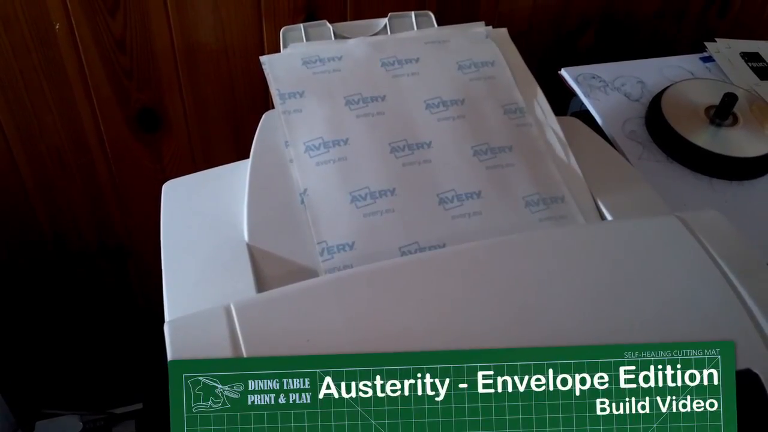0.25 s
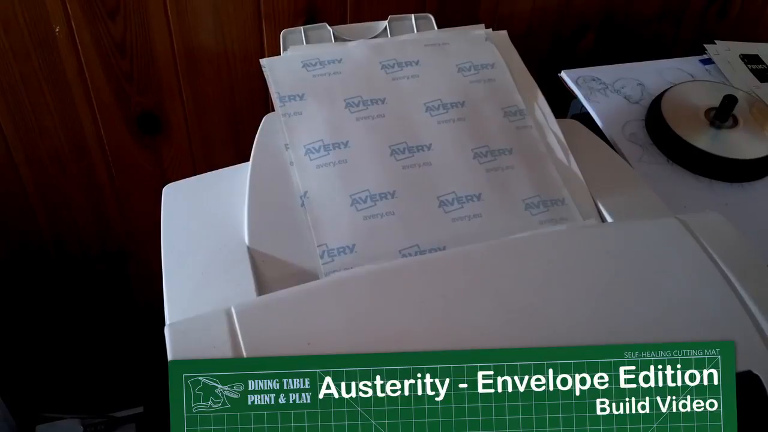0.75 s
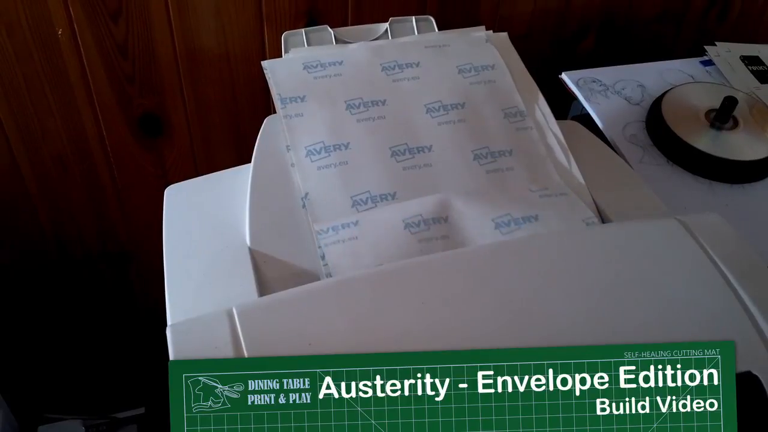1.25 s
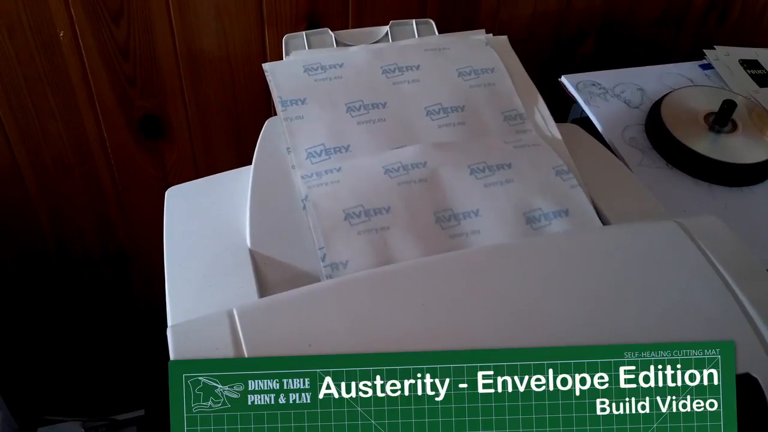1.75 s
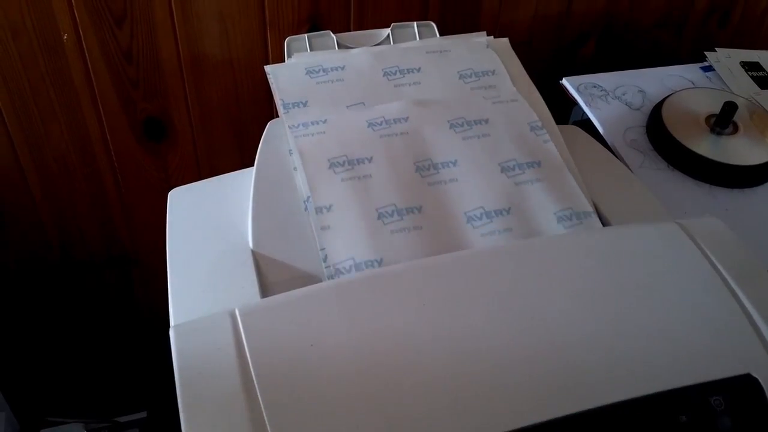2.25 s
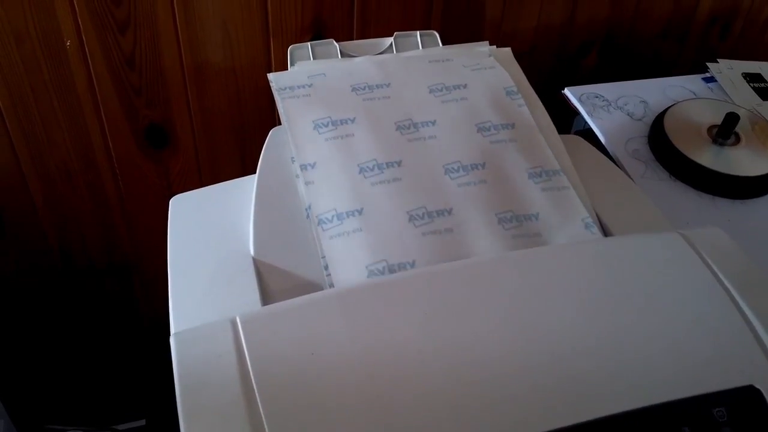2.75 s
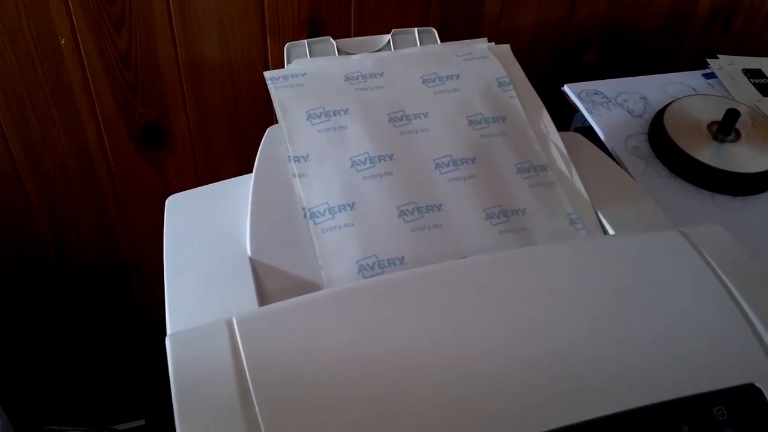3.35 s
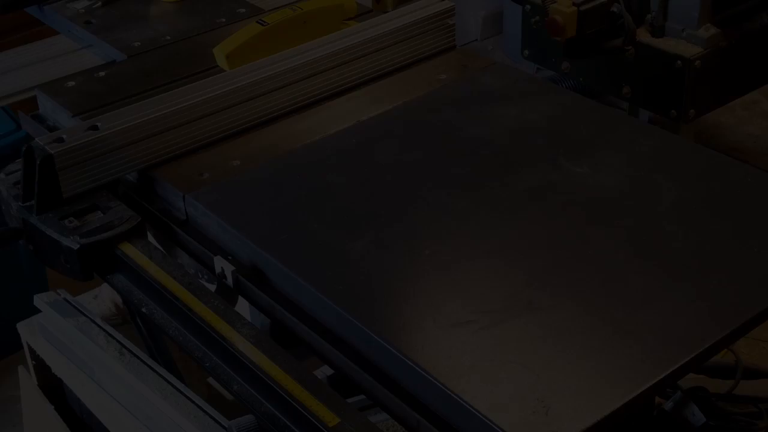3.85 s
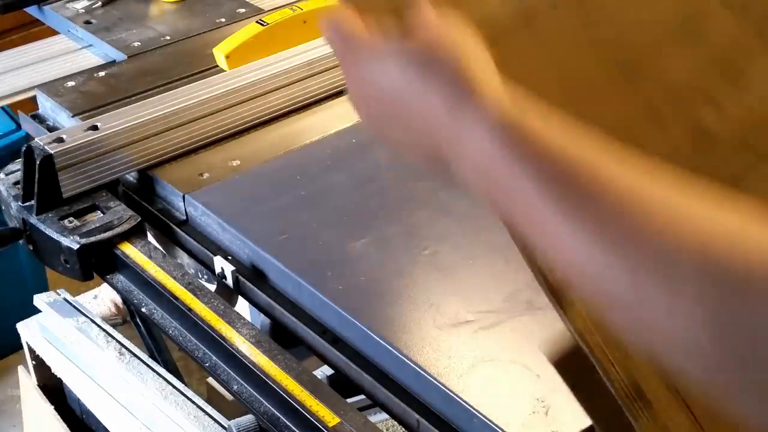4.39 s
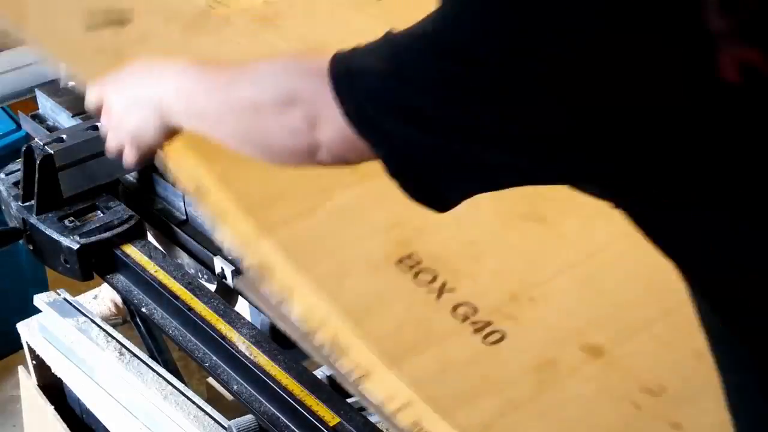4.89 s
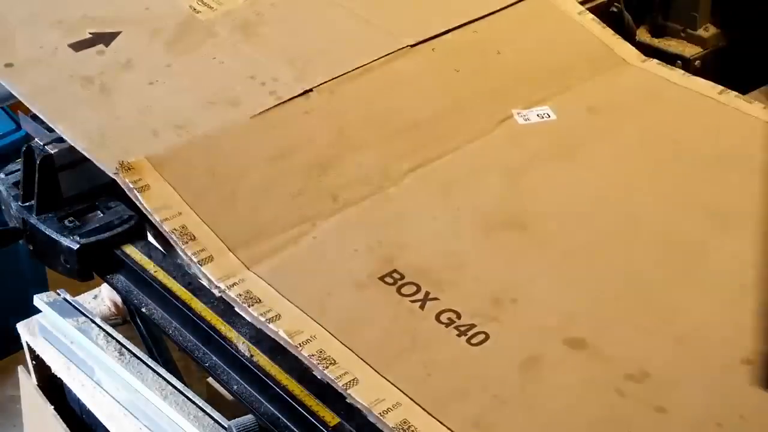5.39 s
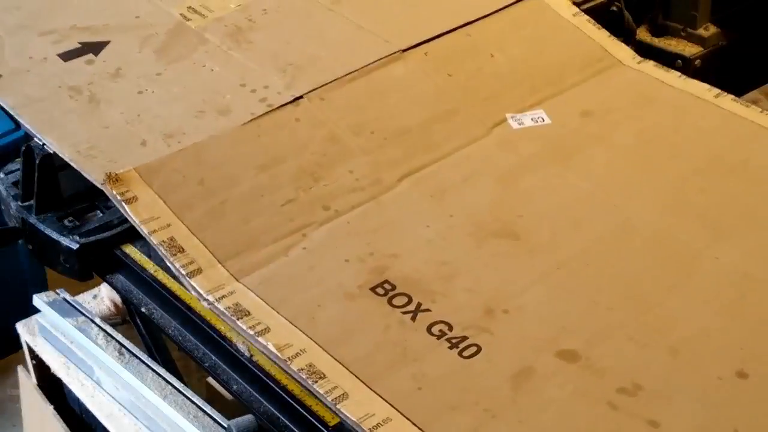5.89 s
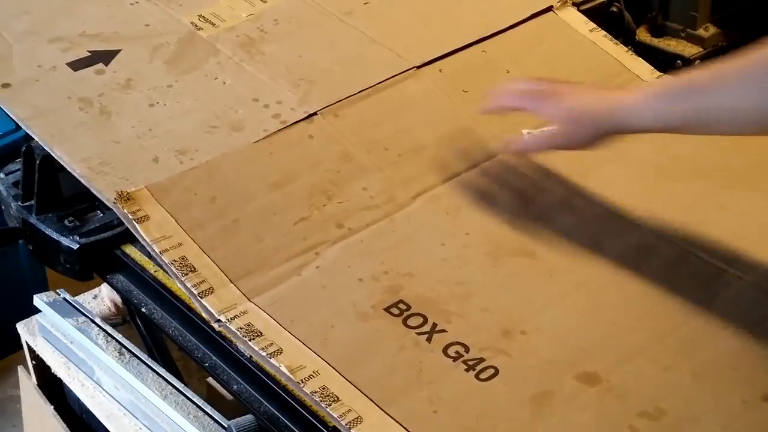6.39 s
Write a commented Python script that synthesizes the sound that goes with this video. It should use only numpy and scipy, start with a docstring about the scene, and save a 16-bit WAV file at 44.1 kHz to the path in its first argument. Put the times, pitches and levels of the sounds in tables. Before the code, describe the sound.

From 0 to 3.8 seconds a desktop printer runs close by in wide stereo: a steady, many-toned gear and fan whine over low fluttering hum and airy roller hiss. Faint bright ticks come about ten times a second at most, loosely spaced, with crisp paper snaps near 0.3, 1.1, 1.3, 2.5 and 2.9, and the sharpest crack at 3.2. From 3.65 it dips, treble first, and cuts off at 3.79. Now mono, in a small, briefly reflective workshop: quiet cardboard rustles and bumps, a buckling pop at 4.04, scrapes around 4.6. Two heavy, hollow board slaps hit at 4.86 and 4.99, by far the loudest moment, ringing briefly. Softer knocks and sliding follow at 5.25 to 5.65, then gentle dry rubbing, small pats and faint squeaks from 5.8 to 6.6, with a soft final scrape.

```python
"""Desk, then workshop: a desktop printer runs, then a large cardboard sheet is handled on a bench.
Printer, stereo: gear and fan tones whine and hum, shaped noise makes the air and roller hiss,
noise bursts and struck resonances make snaps and ticks. It fades, treble first, and is cut off.
Cardboard, at a single microphone: carried in, dropped twice, slid flat and patted. Uneven noise drives board
modes and coloured rubbing; narrow-band blips and squeaks, rung modes, one pop and reflections are added."""
import sys
import numpy as np
from scipy import signal
from scipy.fft import rfft, irfft
from scipy.io import wavfile

SR = 44100
rng = np.random.default_rng(int(sys.argv[2]) if len(sys.argv) > 2 else 0)


def put_to_file(sound):
    """Save the sound as 16-bit audio at rate SR, in the file named by the first command-line argument."""
    columns = np.atleast_2d(sound).T  # one column per channel
    safe = np.clip(columns, -1, 1)
    whole_steps = np.round(safe * 32767)
    wavfile.write(sys.argv[1], SR, whole_steps.astype(np.int16))


N = 292383
SWITCH_S = 3.786   # printer cut off, cardboard starts


def amp(db):
    """Amplitude factor from dB."""
    return np.exp(np.asarray(db) * np.log(10) / 20)


def rms_one(x):
    """Scale to rms 1."""
    return x / np.sqrt(np.mean(x ** 2) + 1e-20)


def in_time(rows):
    """Each column interpolated over the samples; first column is seconds."""
    s, *columns = np.transpose(rows)
    return [np.interp(np.arange(N) / SR, s, column) for column in columns]


def gain_at(points):
    """Gain on the FFT grid, straight in dB over log frequency."""
    grid_hz = np.maximum(np.arange(N // 2 + 1) * SR / N, 1)
    points_hz, points_db = np.array(points)[:, 0], np.array(points)[:, 1]
    return amp(np.interp(np.log(grid_hz), np.log(points_hz), points_db))


def drift(corner_hz):
    """Slow chance, spread 1: noise at SR / 40 through two equal poles."""
    r = np.exp(-80 * np.pi * corner_hz / SR)
    noise = rng.standard_normal(N // 40 + 2002)
    slow = signal.lfilter([1], [1, -2 * r, r * r], noise)[2000:]   # settled part
    return np.interp(np.arange(N) / 40, np.arange(len(slow)), rms_one(slow))


def ring(x, hz, t60_s):
    """Resonator: a unit click sets a decaying sine of height 1 ringing."""
    r, w = amp(-60 / (t60_s * SR)), 2 * np.pi * hz / SR
    return signal.lfilter([0, np.sin(w)], [1, -2 * r * np.cos(w), r * r], x + 1e-18)


def cut(x, hz, kind, order=2):
    """Butterworth filter."""
    return signal.sosfilt(signal.butter(order, hz, kind, fs=SR, output="sos"), x)


def burst(start_s, t60_s, rise_s):
    """Envelope: quick rise, exponential fall."""
    out, start = np.zeros(N), int(start_s * SR) + 1
    age_s = np.arange(start, min(N, start + int(2 * t60_s * SR))) / SR - start_s
    out[start:start + len(age_s)] = (1 - np.exp(-age_s / rise_s)) * amp(-60 * age_s / t60_s)
    return out


def grains(spread_db):
    """Noise of uneven contacts, rms 1."""
    return rms_one(rng.standard_normal(N) * amp(spread_db * np.minimum(rng.exponential(1, N), 4)))


# Air and rollers, noise density. Each row: Hz, dB per Hz.
AIR_DENSITY = [(40, -116), (90, -110), (130, -101), (250, -95), (340, -96.5), (700, -84.5), (1150, -88),
               (1350, -89), (2700, -89), (3000, -92.5), (5500, -90), (6200, -96.5), (7500, -101),
               (12000, -106), (15500, -120)]
# Housing resonances. Each row: centre in Hz, width in Hz, nominal level in dB.
HOUSING_MODES = [(289, 38, -73), (381.6, 13.5, -64), (410, 19, -63.5), (500.6, 56, -59), (557, 88, -63),
                 (821, 10, -67), (1105, 94, -63.5), (2150, 150, -76), (2760, 64, -68.5), (4410, 64, -69),
                 (5030, 200, -81), (9100, 150, -93)]
# Narrow bands cancelled by the desk's reflection. Each row: centre in Hz, width in Hz, depth in dB.
DESK_DIPS = [(744, 71, -2), (1396, 120, -2.5), (2410, 120, -2), (2810, 75, -3.5), (3060, 69, -2),
             (5510, 180, -5.5), (6960, 270, -3)]
# Stereo width of the air. Each row: Hz, side over mid in dB.
AIR_SIDE_OVER_MID = [(60, -14), (99, -8), (160, -10), (270, -12), (450, -16.5), (740, -13), (1220, -11),
                     (2010, -6.5), (3330, 1), (5500, -4.5), (9080, -1.5), (15000, 1)]
# Balance of the air. Each row: Hz, left over right in dB.
AIR_BALANCE = [(60, -2), (92, 1), (140, 5.5), (210, -1.5), (330, 3.5), (500, 1), (770, 0.5), (1170, 1),
               (1790, 1), (2740, 3.5), (4190, 0.5), (6410, -3), (9810, 1), (15000, 0.5)]


def air():
    """Broad noise plus noise in the housing resonances; width and balance vary with frequency."""
    hz = np.arange(N // 2 + 1) * SR / N
    power = gain_at(AIR_DENSITY) ** 2
    for centre_hz, width_hz, level_db in HOUSING_MODES:
        offset = 2 * (hz - centre_hz) / width_hz
        power = power + amp(level_db) ** 2 / width_hz / (1 + offset ** 2) ** 2
    for centre_hz, width_hz, depth_db in DESK_DIPS:
        offset = 2 * (hz - centre_hz) / width_hz
        power = power * amp(depth_db / (1 + offset ** 2)) ** 2
    mid, side = rfft(rng.standard_normal((2, N))) * np.sqrt(power * SR / 2)
    side = side * gain_at(AIR_SIDE_OVER_MID)
    pan = np.sqrt(gain_at(AIR_BALANCE))
    return amp(.5 * drift(10.5)) * irfft([(mid + side) * pan, (mid - side) / pan], N)


SHAFT_HZ = 33.629
# Motor and gear teeth. Each row: multiple of shaft speed, level in dB, left over right in dB, left lead in rad.
GEAR_TONES = [(24, -65.5, -1.0, 0.1), (30, -65.0, -0.6, 0.1), (51, -75, 0, 0.0), (52, -75, 0, 0.0),
              (56, -73.0, 1.5, 0.0), (60, -75, -2.8, -0.0), (64, -70.2, -1.1, -0.3), (65, -67.1, 1.2, -0.7),
              (70, -71.6, 1.6, -2.6), (73, -71.6, 1.3, 0.4), (80, -80, 9.3, 1.0), (90, -67.1, 2.9, 2.6),
              (95, -83, 1.8, -1.0), (97, -81, -2.1, 0.4), (110, -74.5, 4.9, -2.5), (120, -62.9, 6.3, 0.4),
              (121, -73.5, 4.4, 0.5), (139, -80.5, -0.9, -0.1), (140, -68.6, -1.3, 0.4),
              (145, -77, -2.2, 0.1), (150, -73.2, 2.3, -0.8), (155, -80.5, -3.2, -1.1),
              (159, -66, -4.6, 0.1), (160, -63.7, -6.4, 0.8), (165, -71.5, -8.1, 1.5),
              (169, -74.5, -3.9, 0.9), (170, -60.2, -4.0, 0.2), (174, -83, -6.1, 0.5),
              (175, -73.5, -4.5, 1.1), (180, -69.7, -6.6, -3.1), (181, -80.3, -5.2, 0.7),
              (185, -77.6, 4.9, 1.0), (190, -74.0, -5.3, -1.0), (193, -85, -7.6, -0.4),
              (195, -78.1, -9.1, -2.4), (199, -80.2, -10.4, 2.8), (200, -64.3, -10.8, -3.1),
              (205, -86.5, 0.9, -1.6), (210, -82.8, -1.7, -1.9), (215, -79.6, -3.4, 0.6),
              (220, -86, -12.6, 0.9), (230, -78.3, -6.9, -2.7), (255, -86.5, -3.1, 1.8),
              (265, -85, -2.4, 1.4), (269, -91, -0.8, 0.1), (270, -79.5, 3.2, 0.6), (295, -82.7, 3.3, 1.0),
              (385, -95, -4.2, -0.5)]
# Fans and other rotors. Each row: Hz, level in dB, left over right in dB, left lead in rad.
ROTOR_TONES = [(392.3, -58, 1.6, 0.2), (535.9, -71.0, -0.1, -0.2), (783.9, -69.6, 1.0, 0.1),
               (1472.3, -65.8, 1.9, -0.4), (1991.8, -80, 0.3, 0.4), (2239.9, -71.2, 3.6, -0.2),
               (2485.3, -72.4, -2.6, 0.3), (2742.8, -78, 7.8, -0.3), (2943.7, -73.8, 3.9, 0.0),
               (3133.5, -68, 12.9, 0.4), (3529.2, -70.6, -1.7, -2.4), (12061.7, -72.5, 10.0, -2.8)]
# Tone wavering. Each row: time in seconds, then added dB below 400 Hz, at 3.1-3.2 kHz, above 12 kHz.
TONE_SWELL = [(0, 2, -5, -2), (.5, 1, -2, -11), (1.3, -4, -1.5, -3), (2, -4, -1.5, -2), (2.2, 5.5, -2, 1),
              (2.8, 2, -2.5, 1), (3.65, 2.5, -0.5, 4), (3.68, 2, -8, -14), (3.8, 4, 12, -15)]
WHINE_STOP_S, WHINE_STOP_DB_PER_S = 3.708, 301.5   # tones above 5 kHz die first
THROB_DB, THROB_CORNER_HZ = 2.2, 10.0   # uneven flutter of the lowest hum


def whine():
    """Steady rotor tones; each wavers and reaches the two ports with its own level and phase."""
    t, out, sides = np.arange(N) / SR, 0, np.array([[.5], [-.5]])
    stop_db = WHINE_STOP_DB_PER_S * np.maximum(t - WHINE_STOP_S, 0)
    low_db, middle_db, top_db = in_time(TONE_SWELL)
    slips = {}   # neighbouring tones slip together, so pairs pulse in step once a turn
    tones = [(multiple * SHAFT_HZ, *rest) for multiple, *rest in GEAR_TONES] + list(ROTOR_TONES)
    for hz, level_db, pan_db, lead_rad in tones:
        family = round(hz / SHAFT_HZ / 5)
        if family not in slips:
            slips[family] = 2 * np.pi * rng.random() + 0.25 * drift(6.0)
        phase = 2 * np.pi * hz * t + slips[family]
        swell_db = low_db * (hz < 400) + middle_db * (3100 < hz < 3200) + top_db * (hz > 12000)
        swell_db = swell_db - (hz > 5000) * stop_db
        waver_db = THROB_DB * drift(THROB_CORNER_HZ) if hz < 400 else 0.58 * drift(1.8)
        level = np.sqrt(2) * amp(level_db + swell_db + waver_db) * amp(pan_db * sides)
        out = out + level * np.sin(phase + lead_rad * sides)
    return out


# Sheet snapping over the guides. Each row: start in seconds, crackle in dB, thud, body and treble over
# crackle in dB, ring in Hz, ring drive in dB, crackle t60 in seconds.
GUIDE_SNAPS = [(0.2424, -53, -1, -6, -5, 5400, -65, 0.05), (0.275, -56, 4, -6, -10, 500, -62, 0.1),
               (0.296, -59, 2, -4, -10, 524, -59, 0.04), (0.3016, -43.5, -11, -3, -2.5, 5030, -64, 0.058),
               (0.3067, -45, -9, -0.5, -5, 4930, -66, 0.045), (1.0737, -47.5, -4, -9, -17, 5600, -66, 0.04),
               (1.291, -47.5, -15, -1, -9, 5600, -72, 0.036), (2.4836, -40, -13, -6, -22, 5460, -63, 0.017),
               (2.4873, -44.5, -10, -3, -22, 4030, -53, 0.033),
               (2.867, -38.5, -20, -17, -13, 2290, -51.5, 0.026),
               (2.874, -46, -22, -12, -12, 2300, -59.5, 0.08),
               (3.1914, -34.5, -22, 1, -13.5, 1480, -71, 0.073),
               (3.6606, -46.5, -15, 3, -8, 4030, -69, 0.078), (3.708, -43.5, -17, -7, -21, 2500, -61, 0.03)]
# Solid crack in the guides opening the loudest snap. Each row: Hz, strike in dB, t60 in seconds.
GUIDE_CRACK = [(1480, -30, 0.019), (2430, -40, 0.014), (3770, -31, .012), (4940, -31, 0.014),
               (5200, -23.5, 0.014), (6330, -34, 0.015)]
# Roller ticks. Each row: time in seconds, strike in dB.
ROLLER_TICKS = [(0.1336, -44.5), (0.3301, -48), (0.401, -48), (0.461, -51), (0.5438, -48), (0.6284, -50),
                (0.7203, -48), (0.8086, -47), (0.9084, -45), (0.996, -46), (1.157, -47), (1.2254, -52),
                (1.4035, -48), (1.589, -46), (1.6744, -52), (1.7394, -52), (1.903, -47), (1.9874, -51),
                (2.2544, -49), (2.6564, -44), (2.7937, -45)]
CRACK_S = 3.192
SNAP_PAN_DB = -3   # left over right
TICK_HISS_DB = -4.5   # over the strike
SNAP_BANDS_HZ = [300, 1900], [1100, 3300], [3000, 5250], [8500, 12600]   # thud, body, crackle, treble


def sheet():
    """Snaps are short crackles that ring the guides; ticks are faint, bright strikes with hiss."""
    out, crackle = np.zeros((2, N)), np.array([grains(3.7), grains(0.97)])
    crackle = 0.45 * crackle[0] + 0.72 * crackle   # partly shared by both sides
    layers = [rms_one(cut(crackle, edges_hz, "band")) for edges_hz in SNAP_BANDS_HZ]
    for s, level_db, thud_db, body_db, treble_db, hz, ring_db, t60_s in GUIDE_SNAPS:
        shape = burst(s, t60_s, 0.00027) + 0.84 * burst(s, 0.0077, 0.00033)   # crackle plus initial crack
        bands_db = level_db + thud_db, level_db + body_db, level_db, level_db + treble_db
        near = slice(int(s * SR), int(s * SR) + SR // 4)
        out[:, near] += amp(ring_db) * ring((crackle * shape)[:, near], hz, 0.015)
        out[:, near] += shape[near] * sum(amp(db) * layer[:, near] for db, layer in zip(bands_db, layers))
    click = 1. * (np.arange(N) == round(CRACK_S * SR))
    out += sum(amp(db) * ring(click, hz, t60_s) for hz, db, t60_s in GUIDE_CRACK)
    out *= amp([[SNAP_PAN_DB / 2], [-SNAP_PAN_DB / 2]])
    tick_shape = sum(amp(db + TICK_HISS_DB) * burst(s, 0.03, .0005) for s, db in ROLLER_TICKS)
    strikes = np.zeros(N)
    strikes[[round(s * SR) for s, db in ROLLER_TICKS]] = amp(np.array(ROLLER_TICKS)[:, 1])
    out += ring(strikes, 4800, 0.019) + ring(strikes, 5650, 0.011)
    hiss = rms_one(cut(crackle, [4500, 6000], "band"))
    hiss = hiss + amp(-9.0) * rms_one(cut(crackle, [8500, 11500], "band"))
    return cut(out, 320, "high") + tick_shape * hiss


BODY_DB, TREBLE_DB, SPLIT_HZ = .5, -2.5, 4600   # trims on all printer levels
FADE_START_S, BODY_FADE_DB_PER_S, TREBLE_FADE_DB_PER_S = 3.647, 29, 43
CUT_OFF_S = .006


def printer():
    """Sum of printer sources in two bands; the treble fades faster, then both are cut off."""
    t = np.arange(N) / SR
    fading_s = np.maximum(t - FADE_START_S, 0)
    on = np.clip(1 - (t - SWITCH_S) / CUT_OFF_S, 0, 1) ** 2
    x = whine() + air() + sheet()
    low, high = [cut(cut(x, SPLIT_HZ, kind), SPLIT_HZ, kind) for kind in ("low", "high")]
    body = amp(BODY_DB - BODY_FADE_DB_PER_S * fading_s) * low
    treble = amp(TREBLE_DB - TREBLE_FADE_DB_PER_S * fading_s) * high
    return on * (body + treble)


SHOP_T60_S, SHOP_DB = 0.24, -13.5


def workshop(x):
    """Reflections: dying noise after a 4 ms gap, duller than the direct sound."""
    age_s = np.arange(int(.6 * SR)) / SR
    tail = rng.standard_normal(len(age_s)) * amp(-60 * age_s / SHOP_T60_S) * (age_s > .004)
    response = cut(tail / np.linalg.norm(tail), 9100, "low")
    return amp(SHOP_DB) * signal.fftconvolve(x, response)[:N]


# Brief narrow-band noise blips, squeaks and drones. Each row: start in seconds, length in seconds, Hz,
# level at the crest in dB, resonance t60 in seconds.
NARROW_BLIPS = [(3.901, 0.046, 3200, -58, .015), (4.13, 0.026, 1290, -55, .015),
                (4.233, .02, 4600, -55, .015), (4.238, .03, 6000, -59, .008),
                (4.636, 0.045, 1660, -55.5, 0.02), (5.959, 0.025, 2280, -55, .015),
                (6.095, 0.11, 3525, -61, 0.05), (6.135, .04, 330, -52, 0.06), (6.195, .04, 330, -49, 0.06),
                (6.134, 0.088, 4400, -67, .05), (6.19, .08, 2350, -66, .02), (6.51, 0.13, 3500, -61, 0.05),
                (6.57, 0.08, 700, -50.5, 0.035), (6.555, 0.035, 342, -50, .06)]


def narrow_blips():
    """Blips, squeaks and drones: noise in a narrow resonance under a smooth swell."""
    t, out, noise = np.arange(N) / SR, 0, rng.standard_normal(N)
    for s, length_s, hz, level_db, t60_s in NARROW_BLIPS:
        swell = np.sin(np.pi * np.clip((t - s) / length_s, 0, 1))
        out = out + amp(level_db) * swell * rms_one(ring(noise, hz, t60_s))
    return out


# Low and middle modes rung by thumps and slaps. Each row: start in seconds, strike in dB, Hz.
THUMP_MODES = [(3.889, -62, 255), (4.032, -62, 256), (4.204, -42.5, 173), (4.233, -46.5, 117),
               (4.864, -32, 150), (4.866, -20, 244), (4.87, -24, 410), (4.873, -27, 654), (4.875, -33, 565),
               (4.988, -27, 247), (4.989, -25.5, 340), (4.991, -30, 544), (4.993, -23, 250.4),
               (4.998, -26, 695), (5.0, -26, 883), (5.015, -26.5, 247), (5.02, -36, 550), (5.278, -55, 255),
               (5.484, -48, 246)]
THUMP_T60_S = 0.095


def thump_modes():
    """Low and middle modes rung by thumps and slaps: each a click into one resonance, then a low-pass."""
    out = np.zeros(N)
    click = 1. * (np.arange(SR // 2) == 0)
    for s, strike_db, hz in THUMP_MODES:
        at = round(s * SR)
        out[at:at + SR // 2] += amp(strike_db) * ring(click, hz, THUMP_T60_S)
    return cut(out, 830, "low")


POP_S, POP_DB, POP_LOW_HZ, POP_HIGH_HZ = 4.03875, -26, 130, 520   # dB: peak before the bass cut


def pop():
    """The sheet buckles once, close by: a sharp push and a longer pull."""
    click = 1. * (np.arange(N) == round(POP_S * SR))
    push = cut(cut(click, [POP_LOW_HZ, POP_HIGH_HZ], "band", order=1), 4800, "low")
    return amp(POP_DB) * push / push.max()


def contact(level_db, boom_db, rustle_db, fizz_db):
    """Power of one contact in boom, scrape, rustle and fizz; fizz is relative to rustle."""
    return amp(level_db + np.array([[boom_db], [0], [rustle_db], [rustle_db + fizz_db]])) ** 2


def struck(drive, modes, spread_db):
    """Modes under uneven contact, two noises dealt in turn; a steady unit drive gives rms 1."""
    touch = [grains(spread_db), grains(spread_db)] * len(modes)
    steady_power = sum(amp(db) ** 2 * t60_s * SR / 4 / (3 * np.log(10)) for hz, db, t60_s in modes)
    ringing = sum(amp(db) * ring(g * drive, hz, t60_s) for g, (hz, db, t60_s) in zip(touch, modes))
    return ringing / np.sqrt(steady_power)


# Restless sheet. Each row: time in seconds, rustle level in dB.
BED_RUSTLE = [(3.79, -66), (4.08, -69), (4.3, -64), (4.56, -80), (4.84, -74), (5.1, -61), (5.17, -70),
              (5.55, -73.5), (6.63, -69.5)]
# Slides. Each row: peak in seconds, rise and fall in seconds per 10 dB (at least 0.001 is used),
# scrape in dB, boom over scrape in dB, rustle over scrape in dB, fizz over rustle in dB.
SHEET_SLIDES = [(3.79, -1, 0.18, -67, 7.5, 2.5, 10.5), (3.924, -0.25, 0.14, -59, 0, 2, 0.5),
                (4.006, -0.22, 0.04, -61.5, 7, 5, -3), (4.225, 0.16, 0.08, -62, 4.5, 0.5, 6),
                (4.4, 0.06, 0.1, -60.5, 0, -5, 4.5), (4.576, -0.01, -0.06, -52, -14, -14, -4),
                (4.658, 0.04, -0.02, -50, -4, -1.5, -1), (4.75, 0.5, 0.5, -66.5, -5, -2.5, 2),
                (5.131, 0.1, 0.18, -58, 7, -10, 2), (5.281, 0.03, 0.1, -51, -11, -16, -2),
                (5.37, 0.1, 0.24, -72, 2, 5.5, 6.5), (5.493, -0.05, 0.06, -52, 2, -4.5, -7),
                (5.582, -0.54, 0.12, -60, 2.5, -9, -1), (5.638, -0.17, 0.07, -57.5, 3, -3.5, -0.5),
                (5.75, -0.2, 0.4, -67, 4.5, -7, -12.5), (5.859, -0.23, 0.05, -56.5, -14, -1, -3),
                (5.972, 0, 0, -58, -7, 0.5, 13), (6.15, 0.11, 0.16, -53.5, -1.5, -12.5, -2),
                (6.259, 0.16, 0, -55.5, 3, -8, 0), (6.422, -0.14, .07, -65.5, -3, -4, 5.5),
                (6.49, 0.2, 0.15, -70, 13.5, -10, -5), (6.58, 0.05, .5, -50, -5.5, -9, -4)]
# Blows and pats. Each row: start in seconds, slap (scrape layer) in dB, boom over slap in dB,
# rustle over slap in dB, fizz over rustle in dB, t60 in seconds.
SHEET_BLOWS = [(3.901, -53.5, 5, 4.5, 5, 0.095), (3.923, -48, 4, -1, 2, 0.066),
               (3.97, -55, -13, -5, -10, 0.055), (4.004, -43.5, 0.5, -4, 6, 0.072),
               (4.098, -54, 2.5, -15, -5, .04), (4.176, -45.5, -13, -6, 1, 0.046),
               (4.207, -51.5, 9.5, -17, -2, 0.065), (4.234, -53.5, -1, -2.5, 7, 0.11),
               (4.572, -46.5, -7, -13, -5, 0.14), (4.639, -63, 6, -3, -6, .073),
               (4.732, -47, 6, -19, 1, 0.028), (4.859, -33.5, 8, -35, -17, 0.056),
               (4.8595, -21, 3.5, -28, -15, 0.081), (4.871, -37, 10.5, -4, -5.5, 0.15),
               (4.904, -43.5, 4, -26, -3, 0.36), (4.921, -52, 4, -22, -3, 0.042),
               (4.9863, -17.5, -1, -24, -19, 0.068), (4.996, -23.5, -1, -13, -14, 0.14),
               (5.038, -40, 4, -4, -0.5, 0.12), (5.09, -46, 3, -16.5, 4, 0.11),
               (5.239, -51.5, 8, -18, -4, 0.11), (5.268, -48, 4, -17, -4, 0.087),
               (5.289, -44, 7, -15, -4, 0.036), (5.435, -51.5, 2, -8.5, 1, 0.22),
               (5.484, -42.5, -6.5, -6, -1, 0.08), (5.627, -51, 0, -4.5, 1.5, 0.11),
               (5.718, -57, 5, -10, -5, 0.068), (5.839, -56.5, -3, 3, -10, 0.18),
               (5.967, -51, -11, 0.5, 8.5, 0.053), (6.245, -55.5, 6, -12, 15, 0.16),
               (6.409, -57, -9, -2, -15, 0.15), (6.482, -57, 10, -14.5, -5, .03),
               (6.506, -57, 11, -11, -5, .03)]
# Board and bench modes. Each row: Hz, relative level in dB, t60 in seconds.
BOARD_MODES = [(99, -29.5, 0.047), (137, -20, 0.043), (188, -11.5, 0.082), (262, -1, 0.09),
               (346, 2.5, 0.048), (425.5, 0.5, 0.055), (519, -0.5, 0.047), (657, 1, 0.024), (843, 2, 0.028),
               (990, 1, 0.022), (1280, 0.5, 0.026), (1450, -6, 0.027), (1834, -3, 0.02),
               (2230, -2.5, 0.027), (2460, -11, 0.04), (2860, -9.5, 0.041), (3080, -6, 0.044),
               (3490, -11.5, 0.04), (3890, -8, 0.044), (4450, -15, 0.054)]
# Scrape colour. Each row: Hz, relative dB per Hz.
SCRAPE_COLOUR = [(450, -8), (800, 1.5), (1000, 1), (1500, -0.5), (2200, -4.5), (3200, -8), (4200, -13.5),
                 (6000, -35.5)]
# Rustle colour. Each row: Hz, relative dB per Hz.
RUSTLE_COLOUR = [(2000, -14), (3500, 1.5), (5000, 3), (7000, -2), (9000, -9.5), (11000, -17)]
# Fizz colour. Each row: Hz, relative dB per Hz.
FIZZ_COLOUR = [(6500, -10.5), (9000, -2.5), (11500, -8.5), (14000, -8), (16000, -4.5)]
LOW_MODES = 8   # these boom, the others ring with the scrape
RING_DB, SCRAPE_NOISE_DB = -5.5, -1.5   # shares of the scrape
BED_BOOM_DB, BED_SCRAPE_DB, BED_FIZZ_OVER_RUSTLE_DB = -60.5, -68, -2
BLOW_RISE_S = 0.0021


def cardboard():
    """Uneven contacts drive the board's modes, scrape, rustle and fizz; blows add to all four."""
    t = np.arange(N) / SR
    rustle_db, = in_time(BED_RUSTLE)
    bed_db = [BED_BOOM_DB + 0 * t, BED_SCRAPE_DB + 0 * t, rustle_db, rustle_db + BED_FIZZ_OVER_RUSTLE_DB]
    power = amp(bed_db) ** 2
    for s, rise, fall, *levels_db in SHEET_SLIDES:
        swell_db = -10 * np.maximum((s - t) / max(rise, 1e-3), (t - s) / max(fall, 1e-3))
        power += contact(*levels_db) * amp(swell_db) ** 2
    uneven_db = 0.47 * drift(33) + 1.1 * drift(79)   # the fibres catch and slip
    power *= (t >= SWITCH_S) * np.array([amp(uneven_db + 0.17 * drift(24)) ** 2 for layer in power])
    for s, *levels_db, t60_s in SHEET_BLOWS:
        shape = burst(s, t60_s, BLOW_RISE_S) + 0.83 * burst(s, 0.0057, 0.00028)   # the edge lands first
        power += contact(*levels_db) * shape ** 2
    boom, scrape, rustle, fizz = np.sqrt(power)
    out = struck(boom, BOARD_MODES[:LOW_MODES], spread_db=1.15)
    out += amp(RING_DB) * struck(scrape, BOARD_MODES[LOW_MODES:], spread_db=2.0)
    rubs = scrape * amp(SCRAPE_NOISE_DB), rustle, fizz
    for level, colour in zip(rubs, (SCRAPE_COLOUR, RUSTLE_COLOUR, FIZZ_COLOUR)):
        out += level * rms_one(irfft(rfft(grains(3.3)) * gain_at(colour), N))
    return out + thump_modes()


def scene():
    """Printer, then cardboard; the workshop microphone has no deep bass."""
    bench = cardboard() + narrow_blips()
    return printer() + cut(bench + workshop(bench) + pop(), 102, "high", order=4)


OFFSET, RUMBLE_DB, CUTOFF_HZ = -.0005, -86.5, 15800


def record(dry):
    """Adds a faint rumble and offset; a steep low-pass cuts the top."""
    rumble = amp(RUMBLE_DB) * rms_one(cut(rng.standard_normal(N), 32, "low"))
    low_pass = signal.ellip(12, .5, 70, CUTOFF_HZ, fs=SR, output="sos")
    return signal.sosfilt(low_pass, dry + rumble + OFFSET)


dry = scene()
out = record(dry)
put_to_file(out)
```